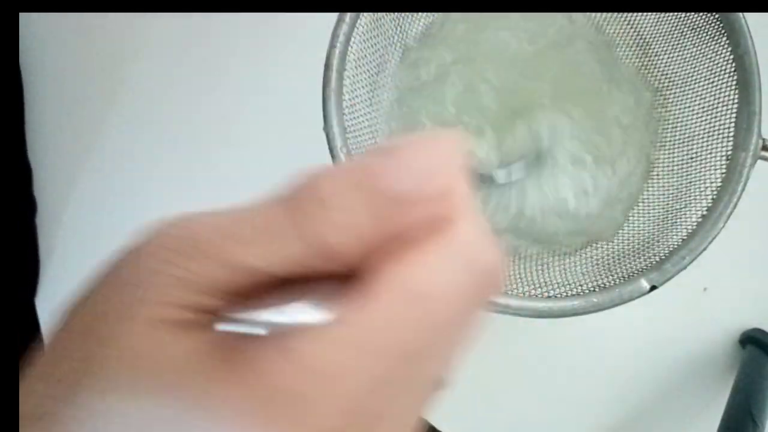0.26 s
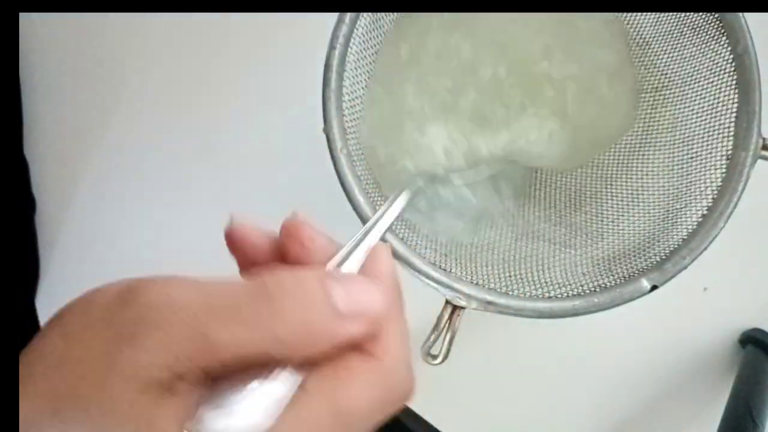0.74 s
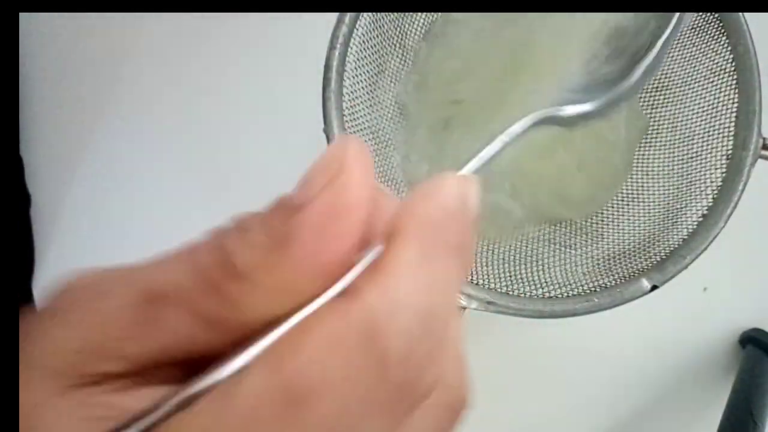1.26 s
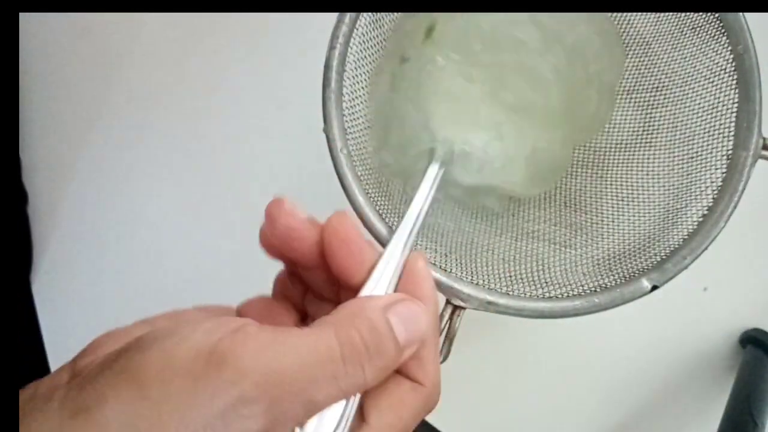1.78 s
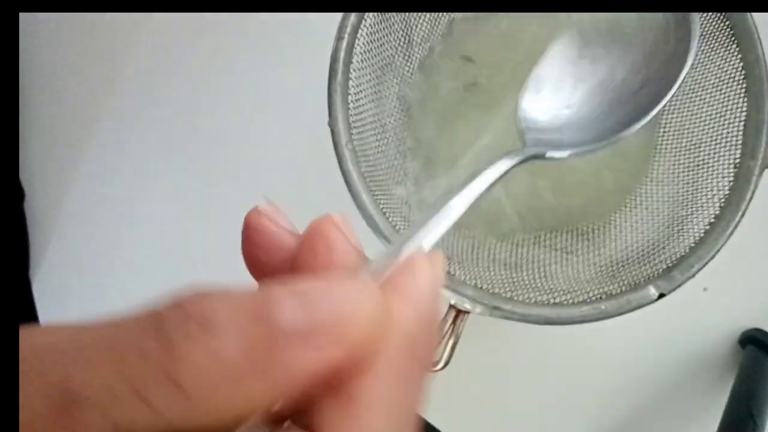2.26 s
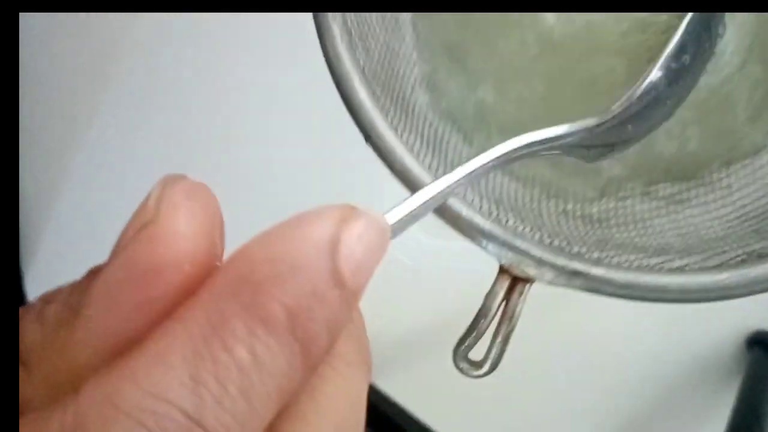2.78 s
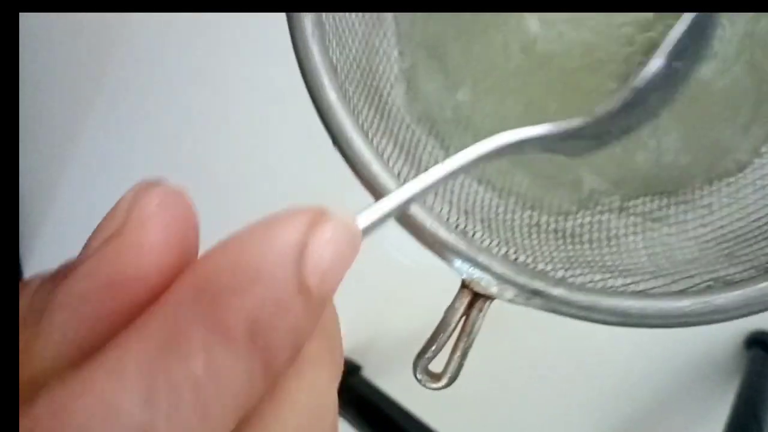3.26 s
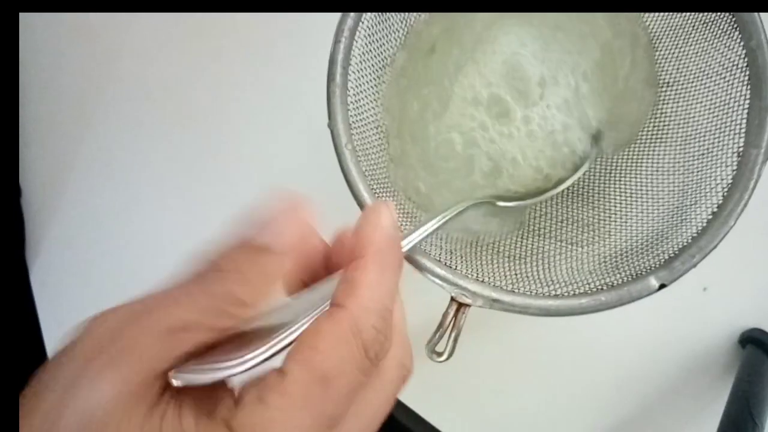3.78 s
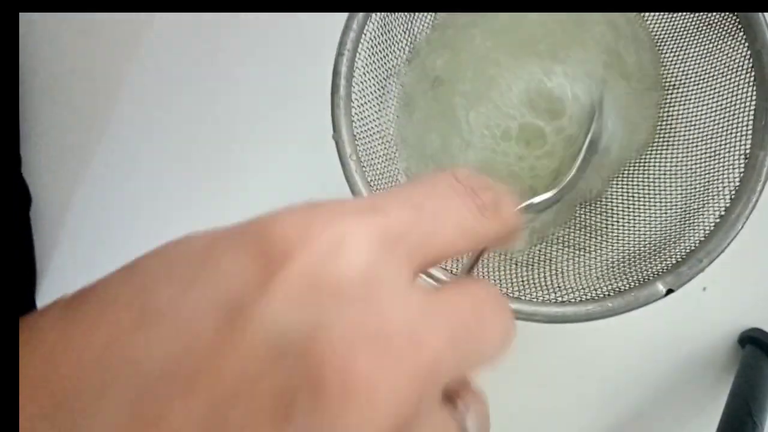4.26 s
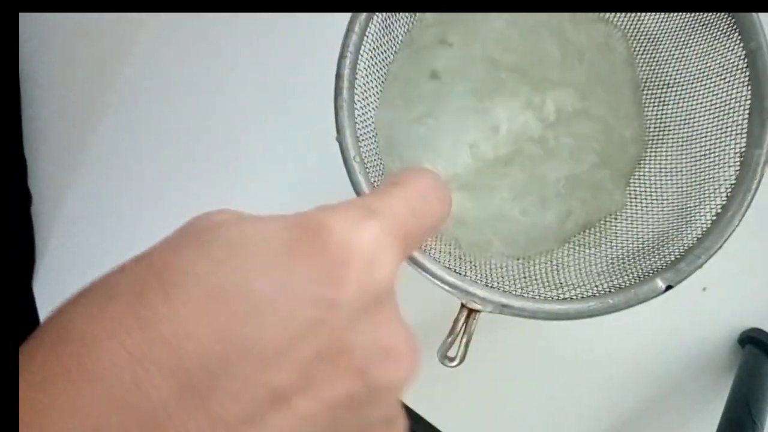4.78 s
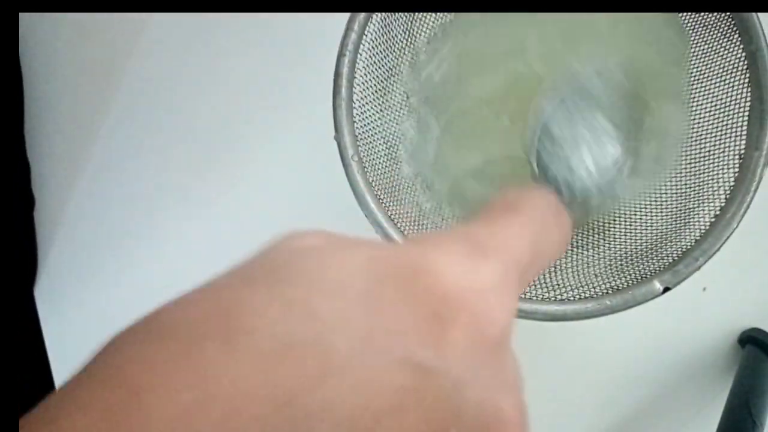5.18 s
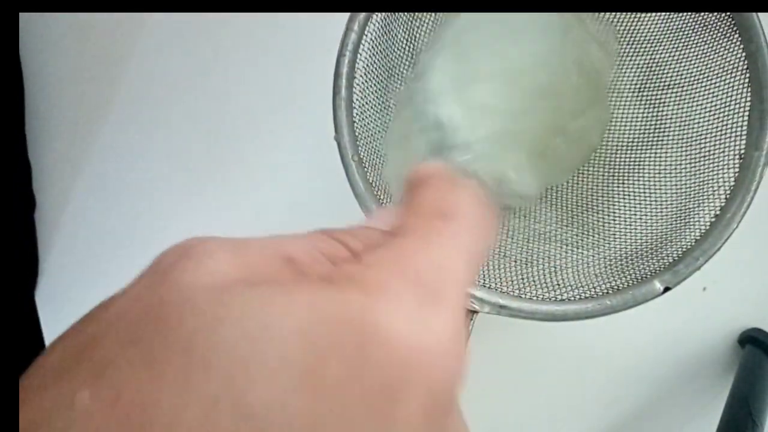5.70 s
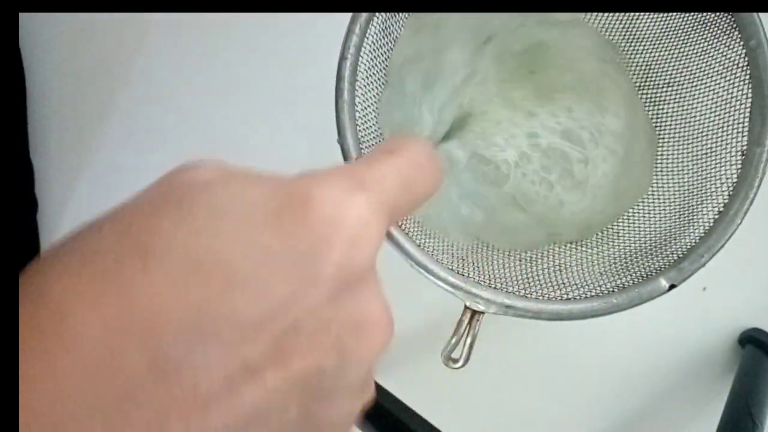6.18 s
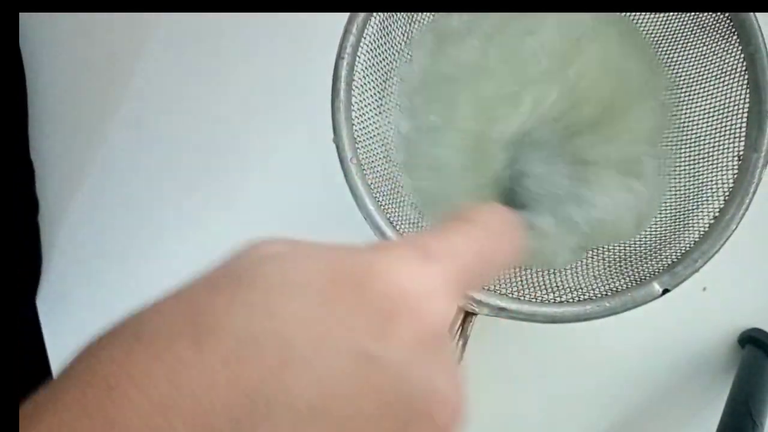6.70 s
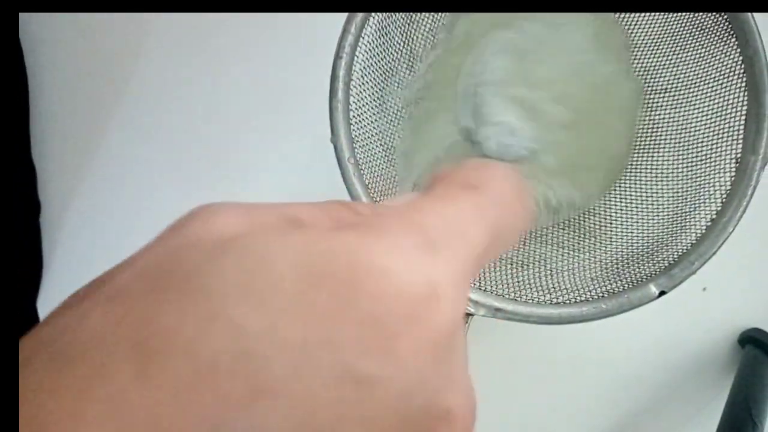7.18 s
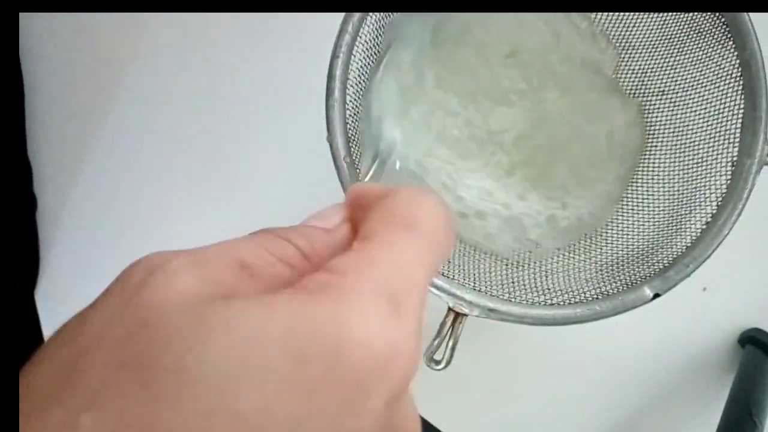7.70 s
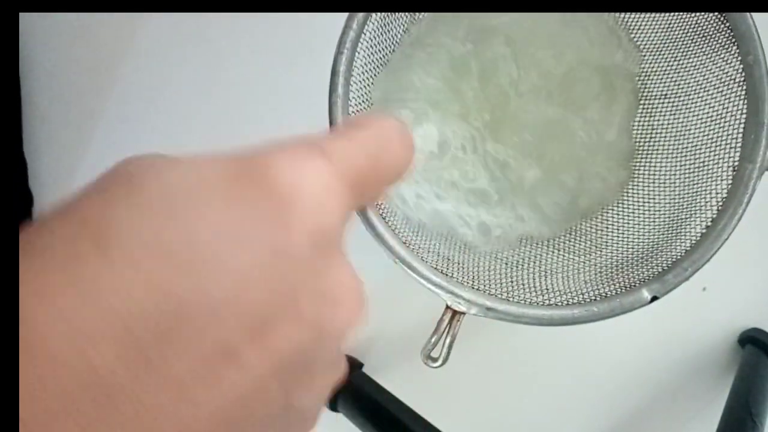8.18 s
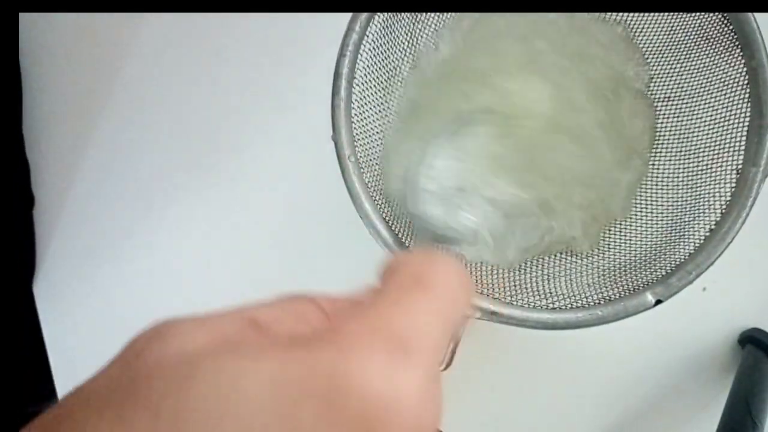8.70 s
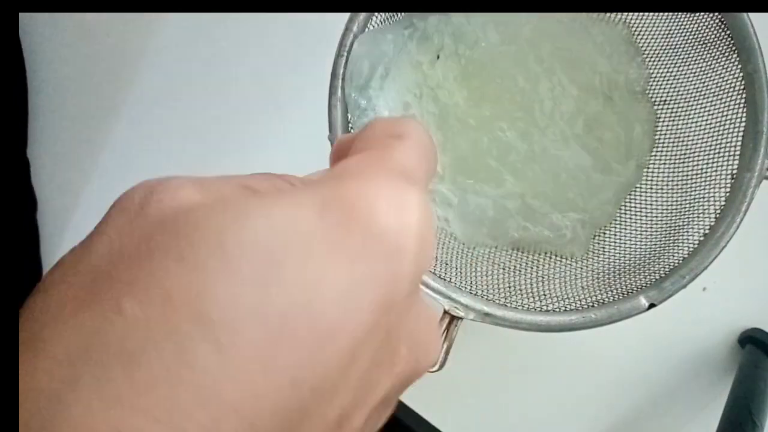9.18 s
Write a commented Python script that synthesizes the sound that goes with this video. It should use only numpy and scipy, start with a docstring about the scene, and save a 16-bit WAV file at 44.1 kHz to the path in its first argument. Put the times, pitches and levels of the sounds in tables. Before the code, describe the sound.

A metal spoon scrapes and taps a wire-mesh strainer in irregular strokes, with tiny wet gel pops, over a faint kitchen hum.

```python
"""A steel spoon scrapes and taps a wire strainer that holds gel, in a small quiet kitchen with a steady hum.
Light scrapes and taps open at 0.56 s and return at 1.55 s; the loudest crack lands at 2.08 s, a dense
cluster at 4.6 to 4.8 s, then looser groups until the last scrapes and taps near 9.2 s.
Wire ticks and taps ring mesh, spoon, frame and worktop as resonators; gel bubbles are rising sine blips.
Filtered noise makes the appliance and air; two microphones hear it all, the left one a little earlier."""
import sys
import numpy as np
from scipy import signal
from scipy.fft import rfft, irfft, next_fast_len
from scipy.io import wavfile
from scipy.ndimage import uniform_filter1d

SR = 44100
rng = np.random.default_rng(int(sys.argv[2]) if len(sys.argv) > 2 else 0)


def dump(signal):
    """Clip the signal to [-1, 1] and save it as 16-bit WAV at the path in sys.argv[1]."""
    limited = np.clip(np.atleast_2d(signal).T, -1, 1)
    pcm = np.round(limited * 32767).astype(np.int16)
    wavfile.write(sys.argv[1], SR, pcm)


N = 416744


def undb(db):
    """Gain of a level in dB."""
    return 10 ** (np.asarray(db) / 20)


def unit(x):
    """Scale a signal to rms 1."""
    return x / np.sqrt(np.mean(x ** 2))


def resonance(x, hz, width):
    """Two-pole band-pass with gain 1 at its centre; hz and width in Hz."""
    return signal.lfilter(*signal.iirpeak(hz, hz / width, SR), x)


def through(x, response):
    """Convolve x with an impulse response, cut to the scene's length."""
    return signal.oaconvolve(x, response)[:N]


def coloured(x, points):
    """Shape x by (frequency [Hz], gain [dB]) points joined on a log-frequency axis."""
    hz, db = np.transpose(points)
    size = next_fast_len(N)
    bin_hz = np.maximum(np.arange(size // 2 + 1) * SR / size, 1)
    gain = undb(np.interp(np.log(bin_hz), np.log(hz), db))
    return irfft(rfft(x, size) * gain, size)[:N]


def strainer():
    """Ticks ring spoon, mesh and frame, slips boom in the worktop, taps ring all four; the gel pops."""
    # resonances of each body: (frequency [Hz], width [Hz], relative level [dB])
    spoon_modes = [(700, 33, -2), (893, 45, 6), (1121, 99, 1.5), (1278, 122, 0.5), (1271, 116, 2),
                   (1592, 190, 3.5), (1894, 195, -1), (2020, 172, -0.5), (603, 100, -3)]
    # the same columns for the wire mesh: (frequency [Hz], width [Hz], relative level [dB])
    mesh_modes = [(2743, 151, 5), (3836, 222, 5.5), (4000, 2040, -1), (5230, 1080, 1.5), (6020, 294, 2),
                  (6654, 330, -1), (7030, 210, 0.5), (7860, 490, -4), (8880, 560, -3.5), (9450, 600, -3),
                  (10290, 970, -11), (12300, 2300, -22.5), (14900, 880, -19)]
    # for the strainer's frame: (frequency [Hz], width [Hz], relative level [dB])
    frame_modes = [(211, 10.8, -2), (248.7, 30.5, -6.5), (291, 16.1, 3.5), (365.5, 40, -6),
                   (449, 77, -11.5)]
    # for the worktop: (frequency [Hz], width [Hz], relative level [dB])
    worktop_modes = [(74, 14, -37), (132.8, 17.5, 5)]

    rings = [body(modes) for modes in (spoon_modes, mesh_modes, frame_modes, worktop_modes)]
    ticks, slips, gains = wire_ticks(), judder(), stroke_gains()
    # one push signal a body: spoon, mesh, frame, worktop
    pushes = (ticks, ticks, ticks + 0.49 * slips, slips + 0.27 * ticks)
    scrapes = sum(through(gain * push, ring) for gain, push, ring in zip(gains, pushes, rings))
    return taps(rings) + scrapes + bubbles(gains[0])


def body(modes):
    """Ring of a body after one short push, energy 1; neighbouring modes swing in opposite sense."""
    push = np.r_[1., np.zeros(SR // 5)]
    ring = sum((-1) ** k * undb(db) * resonance(push, hz, width)
               for k, (hz, width, db) in enumerate(modes))
    return ring / np.sqrt(np.sum(ring ** 2))


def taps(rings):
    """Each tap is a brief rattle of contact that rings every body by its own amount."""
    # taps: (time [s], mesh crack peak [dB], then relative to it: spoon ring [dB],
    # frame flex [dB], worktop boom [dB]); peaks are before the room
    tap_table = [(0.576, -37.5, -4, -5, -25), (1.5543, -39.5, -0.5, -1, -14), (1.588, -56, 2, -9, -11),
                 (1.657, -40.5, 7.5, -7, -4.5), (1.73, -45, -11, -1, 6), (1.838, -46.5, -10, -12, 0.5),
                 (2.0757, -11, -8.5, -16.5, -44), (2.0919, -25, 5, -7, -24),
                 (2.9508, -33.5, -12.5, -33, -28), (3.607, -50, 8, -5, -32), (3.6196, -25, 1, -8.5, -27),
                 (3.9385, -23.5, -6.5, -32, -51), (3.698, -50, 4, -12, -20), (4.0858, -46, 0.5, -23, -12),
                 (4.6106, -37.5, -2.5, -14, -14), (4.6363, -34, 2.5, -4, -11),
                 (4.6464, -23.5, -0.5, -14, -8), (4.661, -35.5, -17, -8, 3), (4.7233, -37, 0, -6, 2),
                 (4.7397, -22.5, -1, -2.5, -30), (5.0112, -41, -14, -23, -19), (5.2272, -31, -6, -10, -34),
                 (5.273, -33.5, 1, -1.5, -13), (6.027, -59, 9, -10, -10), (6.104, -43.5, 9, -2, -11),
                 (6.135, -39.5, 4, 1.5, -1), (6.159, -43, 4, -1, -14), (6.6609, -34, -2, -11, -18),
                 (7.071, -53, -22, -15, -17), (7.3128, -48, -14, -9, -12), (7.3596, -41.5, 3, -9, -9),
                 (7.429, -34, -0.5, -11, -23), (7.4741, -41.5, -6, -11.5, -10), (8.0143, -37, -9, -42, -22),
                 (8.1906, -47, -9, -13, -12), (8.2239, -38, -10, -20, -14), (9.2193, -44.5, -6, -9.5, -21),
                 (9.2529, -42.5, -3, -14, -18.5)]
    swell_s, dies_s = 0.00087, 0.003

    t = np.arange(400) / SR
    rattles = rng.standard_normal((len(tap_table), len(t))) * t * np.exp(-t / swell_s)
    # flatten the spectrum so that the contact has no pitch of its own
    phase = np.angle(rfft(rattles))
    rattles = irfft(np.exp(1j * phase), len(t)) * np.exp(-t / dies_s)

    out = np.zeros(N + SR)
    for (start_s, crack_db, ring_db, flex_db, boom_db), rattle in zip(tap_table, rattles):
        peaks_db = crack_db + np.array([ring_db, 0, flex_db, boom_db])
        for ring, peak_db in zip(rings, peaks_db):
            blow = signal.fftconvolve(rattle, ring)
            out[int(start_s * SR):][:len(blow)] += undb(peak_db) * blow / np.abs(blow).max()
    return out[:N]


def stroke_gains():
    """Gains of spoon, mesh, frame and worktop: each scrape rises, holds and dies away; powers add."""
    # scrapes: (start [s], rise [s], hold [s], fall [dB/s], spoon ring [dB],
    # then relative to it: mesh hiss [dB], frame flex [dB], worktop boom [dB])
    scrape_table = [(0.556, 0.093, 0.019, 346, -43.5, -1.5, 5.5, 9),
                    (0.662, 0.047, 0.068, 312, -48, -2.5, 8, 5.5),
                    (1.548, 0.0097, 0.0044, 336, -49, -3, 7, -9),
                    (1.641, 0.024, 0.033, 340, -44, -4, 6, -12),
                    (2.071, 0.0069, 0.016, 1200, -33, 3, -0.5, -14.5),
                    (2.105, 0.037, 0.052, 142, -59, 4, 1, -3), (2.946, 0.005, 0.002, 601, -66, 8, -13, -16),
                    (3.606, 0.013, 0.002, 247, -40, -10.5, 0, -10.5),
                    (3.938, 0.004, 0.002, 1100, -49, 8, -16, -26),
                    (4.008, 0.088, 0.004, 501, -56.5, -0.5, -1, -9),
                    (4.612, 0.051, 0.04, 102, -57, -7, 9.5, -6),
                    (4.725, 0.015, 0.0014, 807, -30, -6.5, -1, 3.5),
                    (4.761, 0.022, 0.0028, 175, -49.5, -8, 4, 7),
                    (4.999, 0.009, 0.003, 176, -71.5, 7.5, -5, -1),
                    (5.222, 0.01, 0.011, 178, -36.5, -6, 1, -23),
                    (5.399, 0.055, 0.003, 358, -50.5, -5, 3.5, -11),
                    (5.976, 0.067, 0.003, 278, -57, -7, 1.5, -11),
                    (6.101, 0.055, 0.003, 200, -44, -5, 1, -8),
                    (6.276, 0.017, 0.003, 183, -60, 0, -16, -17),
                    (6.656, 0.016, 0.0037, 280, -36.5, -4.5, -0.5, -18),
                    (6.683, 0.033, 0.024, 400, -52, -3.5, 11.5, -6),
                    (6.778, 0.032, 0.003, 163, -49.5, -6, 1, -12),
                    (7.305, 0.015, 0.003, 187, -51, -2.5, 8.5, -11),
                    (7.424, 0.0055, 0.0017, 1000, -44, -1, -4, -25),
                    (7.516, 0.063, 0.003, 400, -57, -2.5, -10, -28),
                    (7.836, 0.068, 0.004, 280, -67, -1.5, -10, -7),
                    (8.01, 0.0035, 0.002, 450, -58.5, 1, -13, -22),
                    (8.07, 0.045, 0.003, 300, -59.5, -6, -4, -14),
                    (8.127, 0.07, 0.003, 268, -53, -5, 3.5, -16),
                    (8.775, 0.14, 0.004, 198, -60.5, -5, 1.5, -11),
                    (8.931, 0.028, 0.11, 144, -56.5, -5.5, -5, -33),
                    (9.141, 0.12, 0.004, 254, -60, 0.5, -3, -3)]
    rise_power = 1.33  # above 1 the pressure builds slowly, then quickly

    power = np.zeros((4, N))
    t = np.arange(SR) / SR
    for start_s, rise_s, hold_s, fall_db_s, ring_db, *rel_db in scrape_table:
        rise = np.minimum(t / rise_s, 1) ** rise_power
        fall = undb(-fall_db_s * np.maximum(t - rise_s - max(hold_s, 0), 0))
        span = power[:, int(start_s * SR):][:, :SR]
        shape = (rise * fall)[:span.shape[1]]
        levels = undb(ring_db + np.r_[0, rel_db])
        span += (levels[:, None] * shape) ** 2
    return np.sqrt(power)


def wire_ticks():
    """Wires snap past the spoon edge at random, most small and some larger; the edge catches and lets go."""
    ticks_per_s, mean_extra_db = 3000, 0.95
    grip_top_hz, grip_db = 65, 3  # grip_db: level change for one rms of grip

    snap = rng.random(N) < ticks_per_s / SR
    size_db = mean_extra_db * rng.exponential(size=N)
    lowpass = signal.butter(2, grip_top_hz, fs=SR)
    grip = unit(signal.lfilter(*lowpass, rng.standard_normal(N)))
    level = undb(size_db + grip_db * np.clip(grip, -2, 2))
    return unit(snap * rng.standard_normal(N) * level)


def judder():
    """The pressed strainer sticks and slips on the worktop at a wavering rate: one push a slip."""
    slips_hz, waver_share = 123.4, 0.049  # mean rate, and its rms waver as a share of it
    waver = unit(resonance(rng.standard_normal(N), 7.75, 9.8))
    turns = np.cumsum(slips_hz * (1 + waver_share * waver) / SR)
    return unit(np.diff(np.floor(turns), prepend=0))


def bubbles(pressure):
    """Air pops out of the gel under the spoon: short blips that glide upward, as loud as the spoon presses."""
    pops_per_s, low_hz, range_octaves = 70, 747, 1.7
    decay_turns, glide = 6, 0.197  # pitch rises by this share over the decay
    level_db = 3.5  # of the largest blip, relative to the spoon's gain

    when, pitch, size = rng.random((int(pops_per_s * N / SR), 3)).T
    t = np.arange(SR // 25) / SR
    turns = low_hz * 2 ** (range_octaves * pitch[:, None]) * t
    gliding_turns = turns * (1 + glide * turns / decay_turns / 2)
    blips = np.sin(2 * np.pi * gliding_turns) * np.exp(-turns / decay_turns)

    out = np.zeros(N + len(t))
    for i, blip, loudness in zip((when * N).astype(int), blips, size):
        out[i:i + len(t)] += undb(level_db) * loudness * pressure[i] * blip
    return out[:N]


def room():
    """Response at each microphone: direct sound, then its own blur of walls above the bass."""
    t60_s, walls_db, bass_split_hz, left_lead_s = 0.25, -1, 412, 0.0009406

    t = np.arange(SR // 3) / SR
    decay = np.exp(-np.log(1000) * t / t60_s)  # ahead of the closing fade below
    onset = 1 - np.exp(-t / 0.0004)
    walls = rng.standard_normal((2, len(t))) * decay * onset

    # hard walls favour no region of the spectrum: even out the broad colour
    spectrum = rfft(walls)
    broad_power = uniform_filter1d(np.abs(spectrum) ** 2, size=40)
    fade = np.cos(1.5 * np.pi * t) ** 2  # reaches silence at the end of the response
    walls = irfft(spectrum / np.sqrt(broad_power), len(t)) * fade
    walls /= np.sqrt(np.sum(walls ** 2, axis=1, keepdims=True))

    highpass = signal.butter(2, bass_split_hz, "high", fs=SR, output="sos")
    ears = undb(walls_db) * signal.sosfilt(highpass, walls)
    ears[:, 0] += 1  # direct sound
    return ears[0], np.r_[np.zeros(round(left_lead_s * SR)), ears[1]]


def heard(sound):
    """Sound at both microphones: the walls answer differently as the spoon moves from place to place."""
    place_s = 0.6  # time from one room response to the next
    t = np.arange(N) / SR / place_s
    out = np.zeros((2, N + SR))
    for k in range(int(t[-1]) + 2):
        near = np.flatnonzero(np.abs(t - k) < 1)
        crossfade = np.cos(np.pi / 2 * (t[near] - k)) ** 2
        part = sound[near] * crossfade
        for ear, response in zip(out, room()):
            wet = signal.fftconvolve(part, response)
            ear[near[0]:][:len(wet)] += wet
    return out[:, :N]


def kitchen():
    """Broad rumble and hiss of the room, with the hum and whine of an appliance as resonated noise."""
    # colour of the room's air noise: (frequency [Hz], relative density [dB per Hz])
    air_colour = [(40, -31), (64, -6), (100, -1.5), (135, -0.5), (190, -14.5), (394, -15), (624, -21.5),
                  (1300, -24.5), (2000, -31.5), (2900, -28), (4250, -35), (6000, -31), (7500, -39),
                  (9500, -42), (11000, -52), (14000, -54.5)]
    # centres of the appliance's hum and whine bands: (frequency [Hz])
    hum_hz = [134, 393, 539, 2606, 3230, 5090, 5835, 6120, 9155, 15100]
    # the same bands in order: (width of each of two filter passes [Hz], rms level before the room [dB])
    hum_bands = [(6.9, -80.5), (7, -77.5), (4.93, -75.5), (17.3, -80.5), (81, -82), (40.5, -90.5),
                 (60, -77), (302, -78.5), (55.556, -89.5), (1180, -94.5)]
    air_db = -60.5  # rms before the room

    air = coloured(rng.standard_normal(N), air_colour)
    hum = np.zeros(N)
    for hz, (width, db) in zip(hum_hz, hum_bands):
        once = resonance(rng.standard_normal(N), hz, width)
        hum += undb(db) * unit(resonance(once, hz, width))
    return undb(air_db) * unit(air) + hum


def scene():
    """Everything sounds from one side and reaches both microphones through the room."""
    spoon, behind = strainer(), kitchen()
    return heard(spoon) + np.array([through(behind, ear) for ear in room()])


def record(dry):
    """The two microphones differ in colour and bass cut; both lose the extreme bass and treble."""
    # colour of left minus right: (frequency [Hz], difference [dB])
    left_colour = [(60, 4.5), (130, 3), (230, 1), (390, -9.5), (520, 9), (900, 0), (5000, 2.5), (8000, 0),
                   (15000, -4)]
    left_cut_hz, low_cut_hz, top_hz = 4.7, 26, 15650

    left = signal.lfilter(*signal.butter(1, left_cut_hz, "high", fs=SR), dry[0])
    # each side takes half of the difference, in opposite directions
    pair = [coloured(x, np.array(left_colour) * [1, half]) for x, half in ((left, .5), (dry[1], -.5))]
    pair = signal.sosfilt(signal.butter(3, low_cut_hz, "high", fs=SR, output="sos"), pair)
    # steep treble cut: 0.2 dB ripple, 70 dB down beyond
    return signal.sosfilt(signal.ellip(8, .2, 70, top_hz, fs=SR, output="sos"), pair)


dry = scene()
out = record(dry)
dump(out)
```